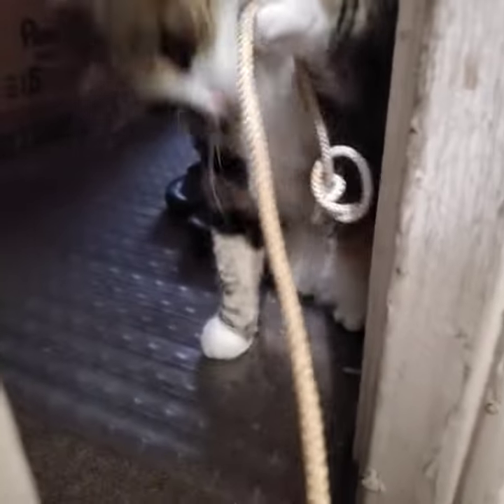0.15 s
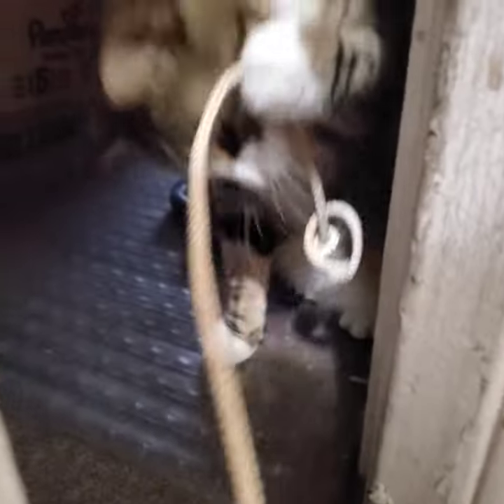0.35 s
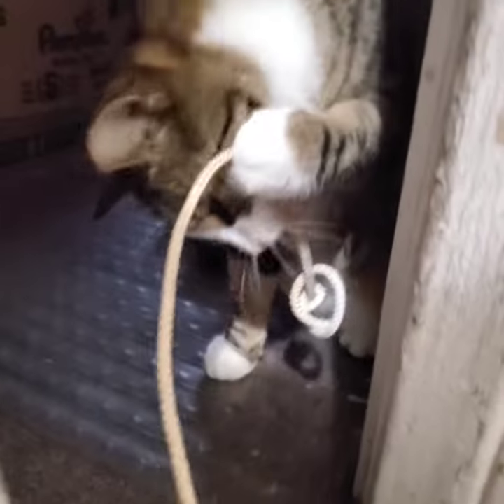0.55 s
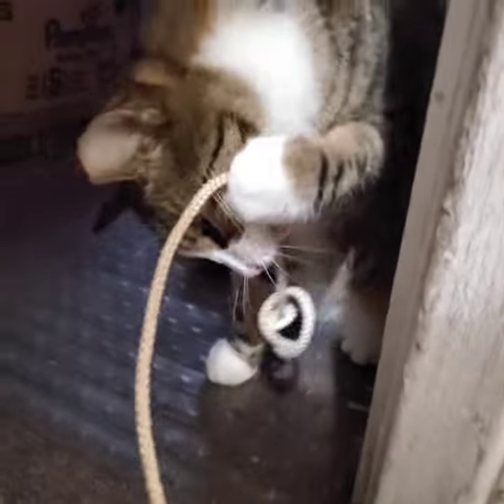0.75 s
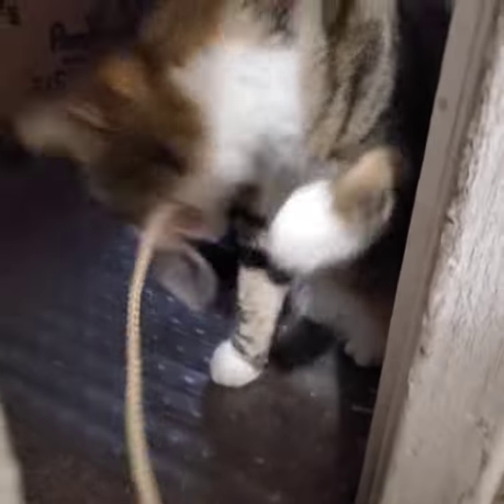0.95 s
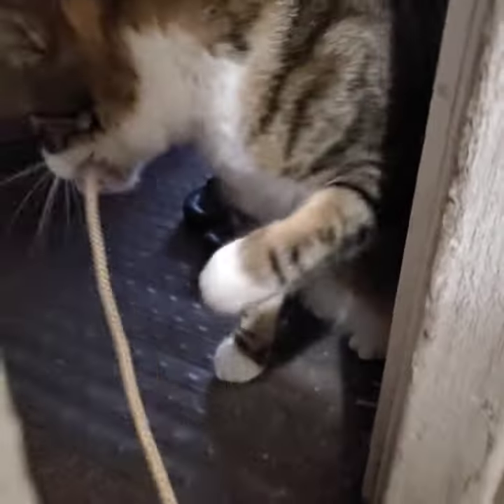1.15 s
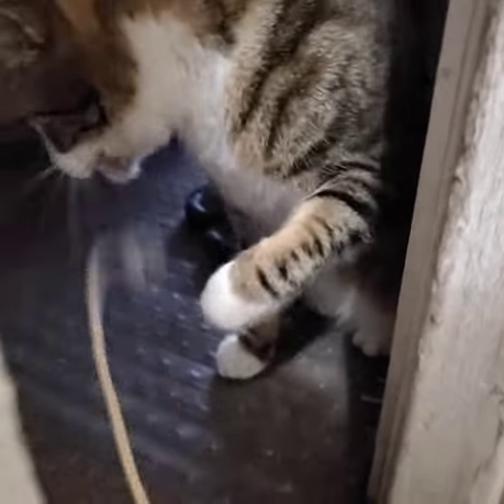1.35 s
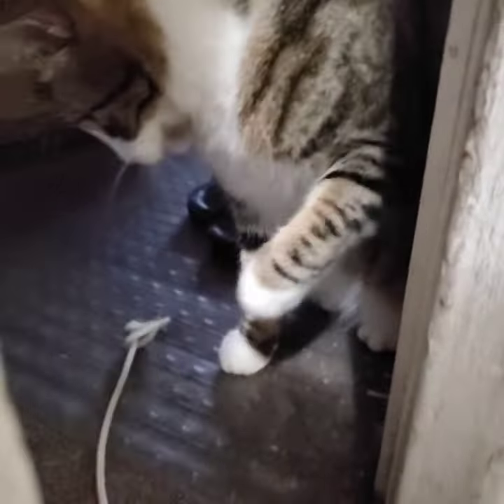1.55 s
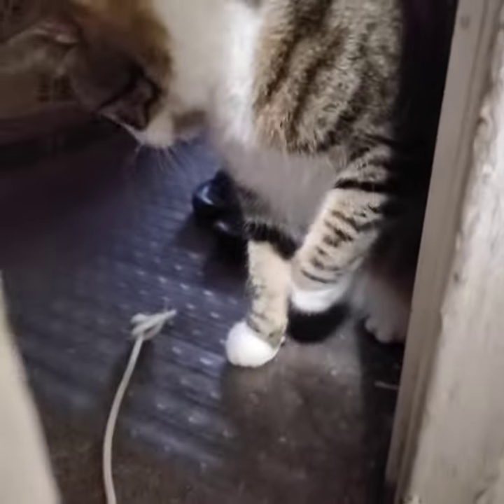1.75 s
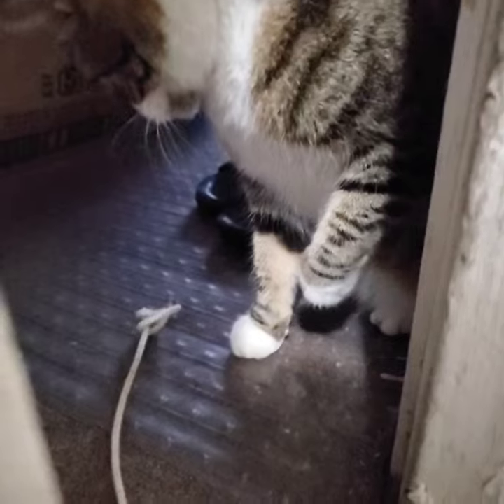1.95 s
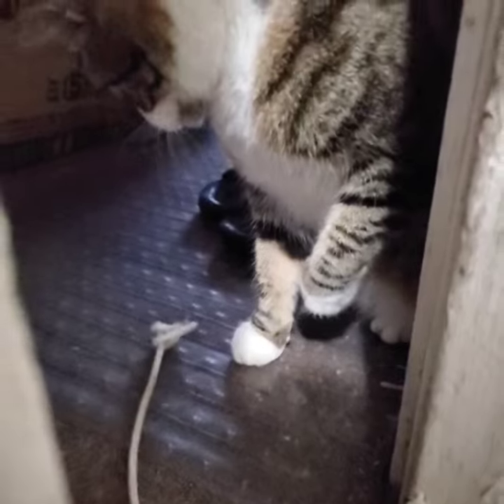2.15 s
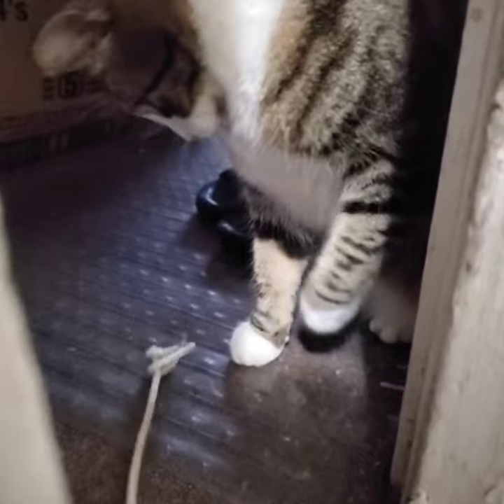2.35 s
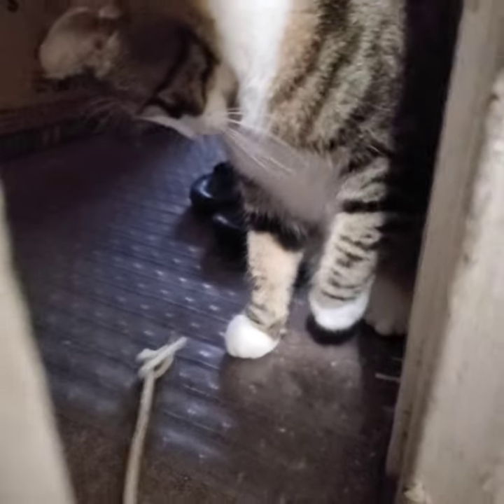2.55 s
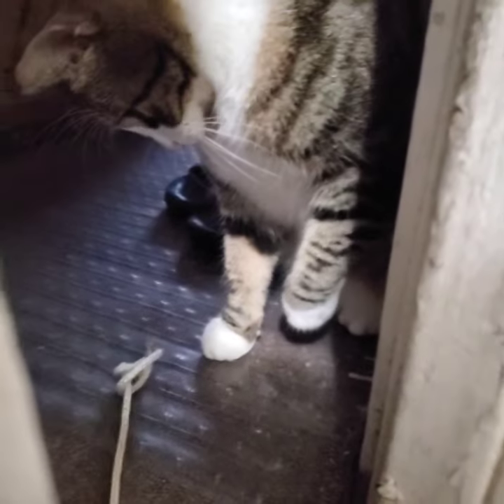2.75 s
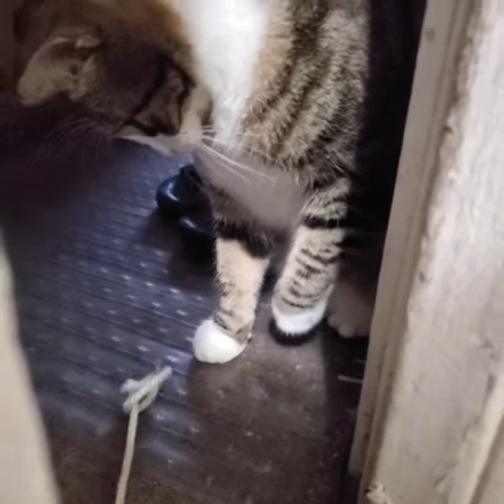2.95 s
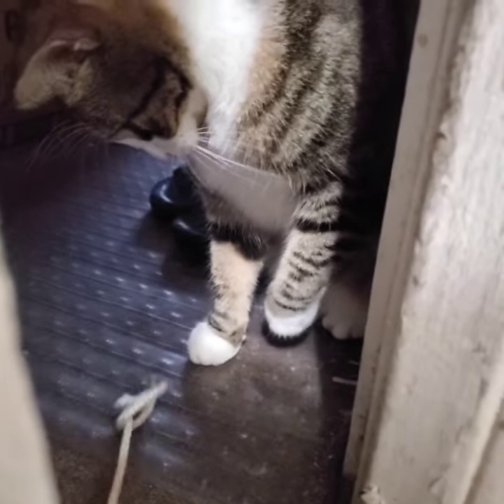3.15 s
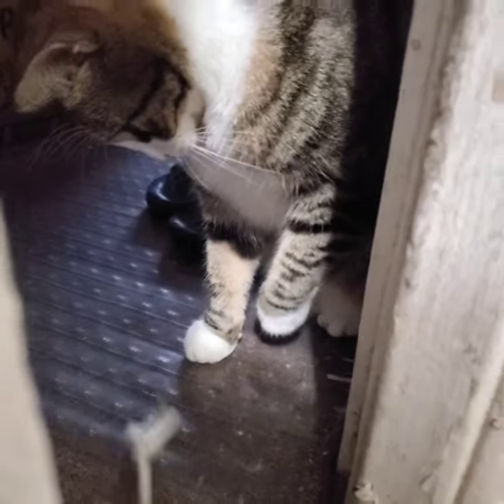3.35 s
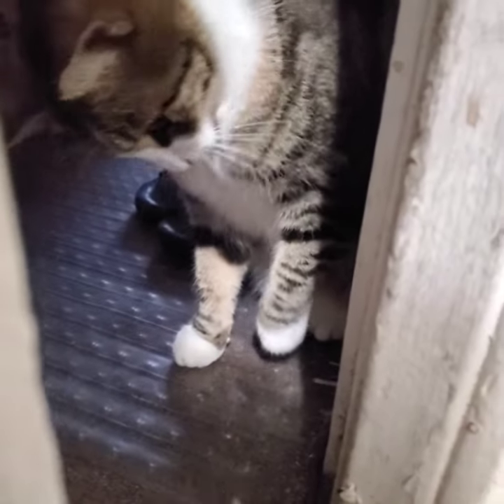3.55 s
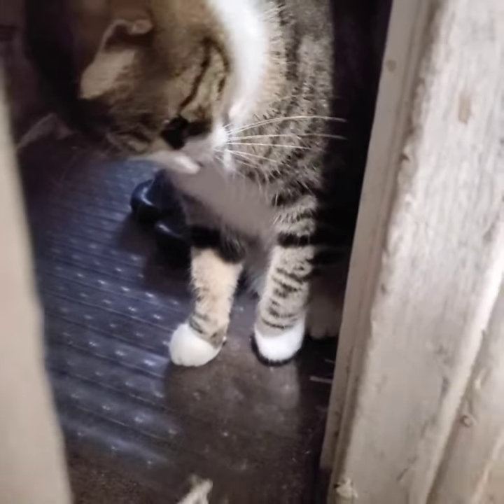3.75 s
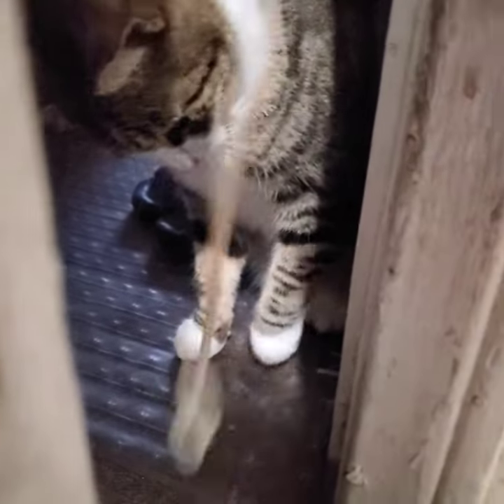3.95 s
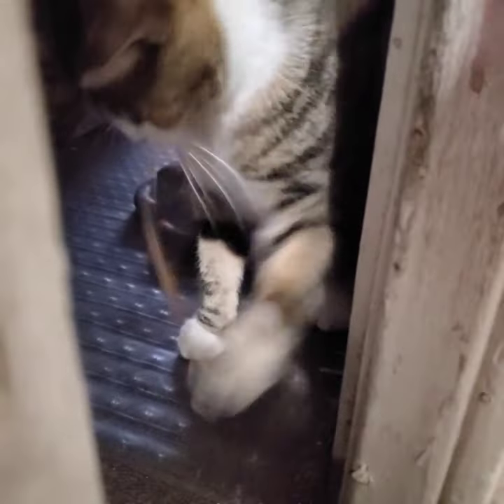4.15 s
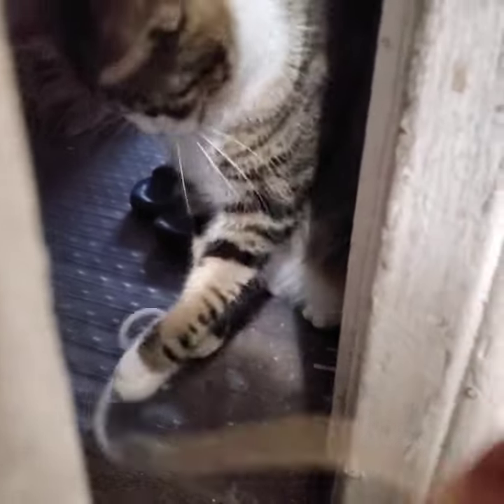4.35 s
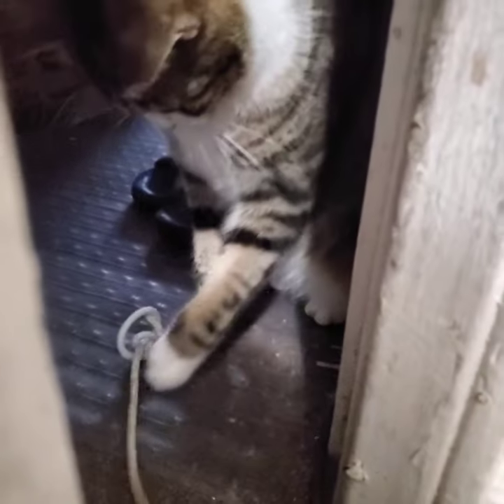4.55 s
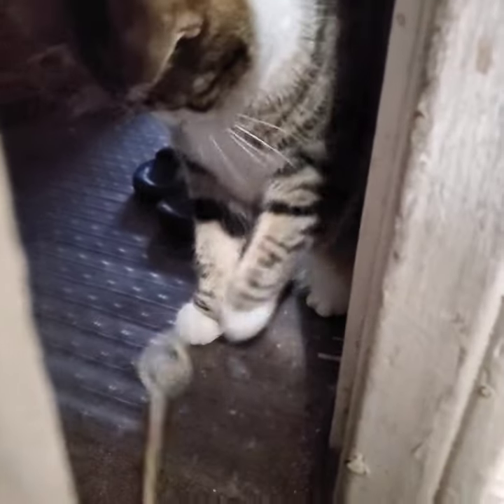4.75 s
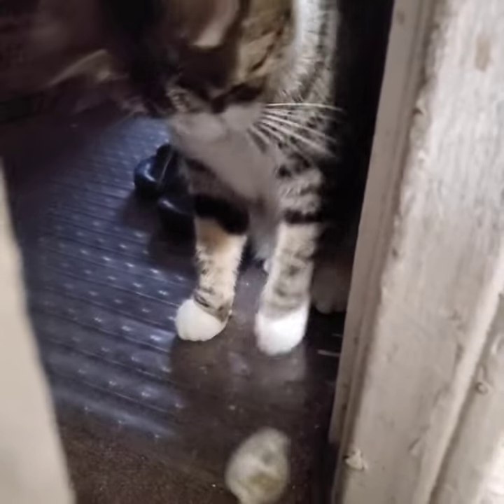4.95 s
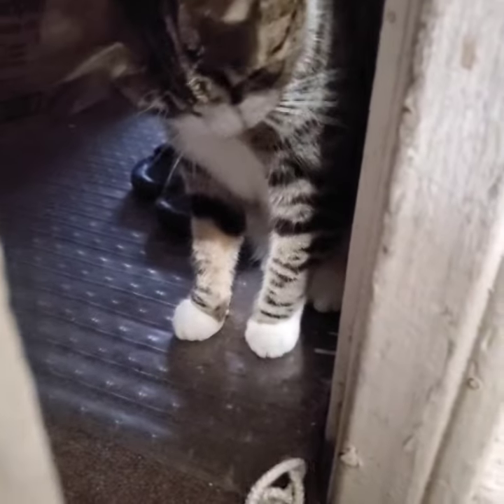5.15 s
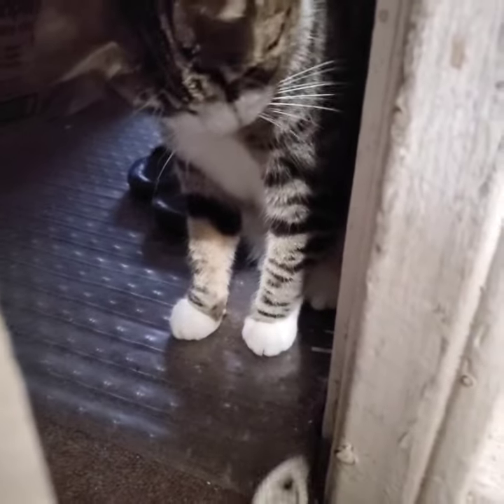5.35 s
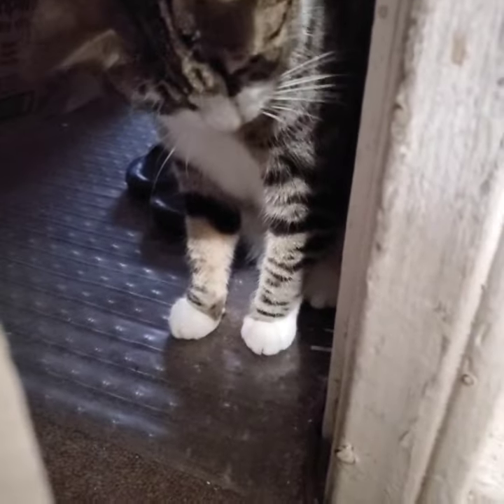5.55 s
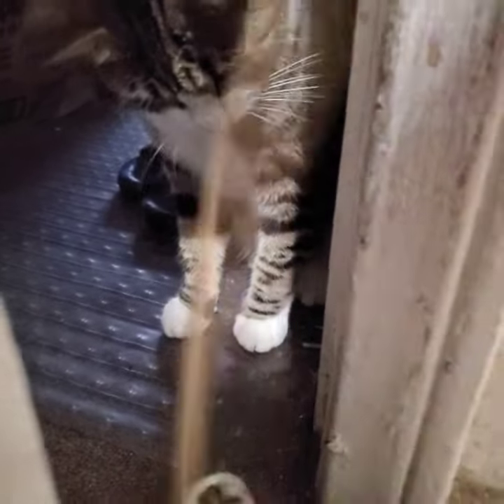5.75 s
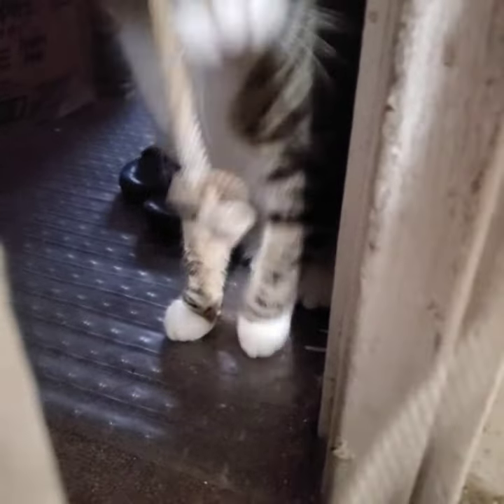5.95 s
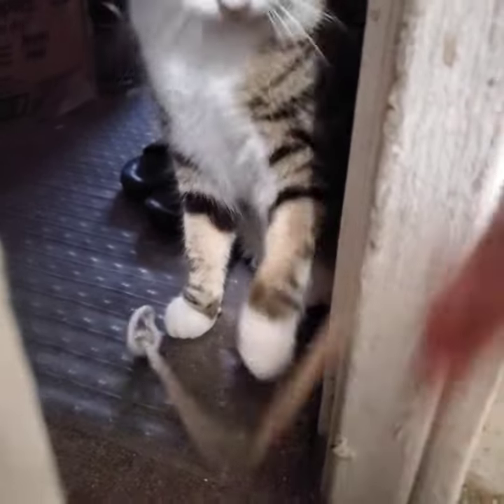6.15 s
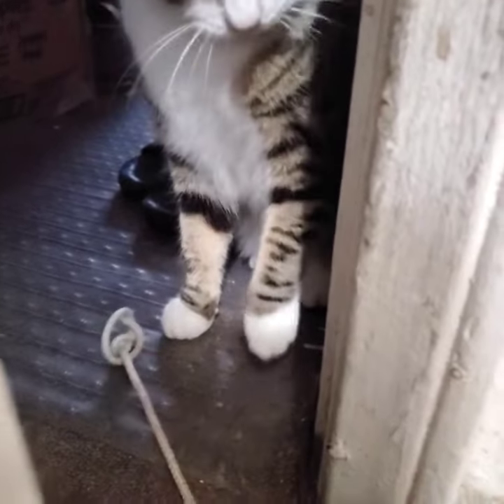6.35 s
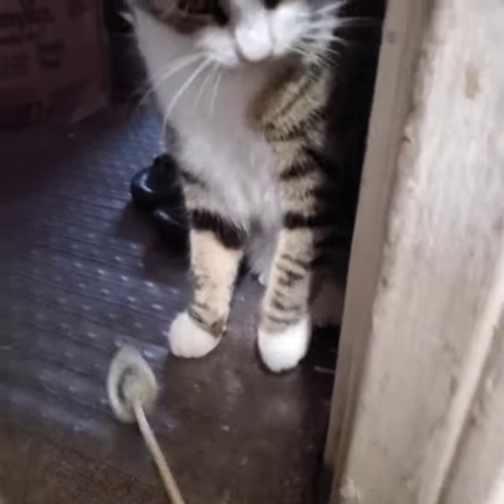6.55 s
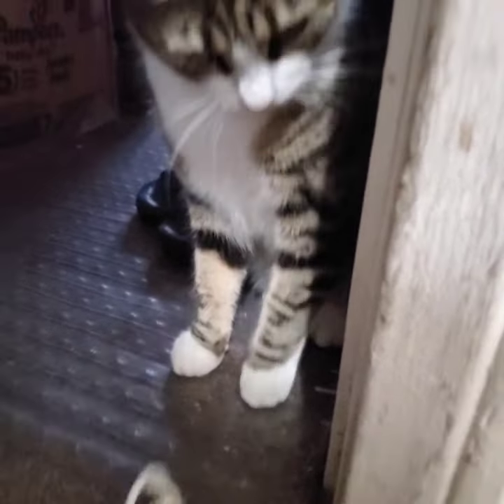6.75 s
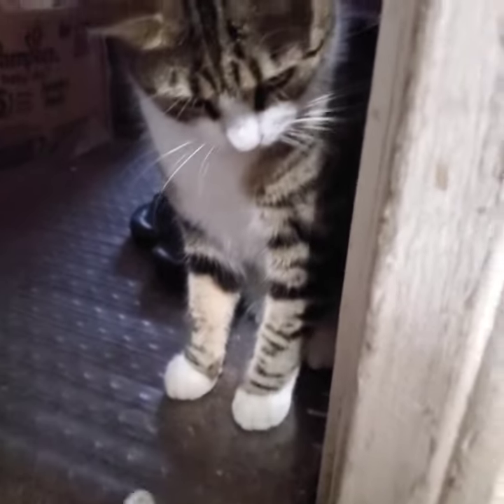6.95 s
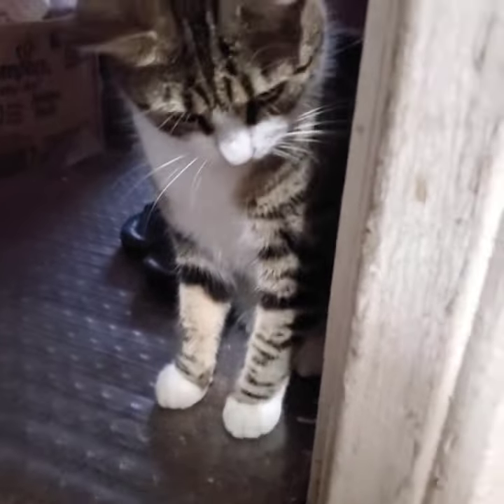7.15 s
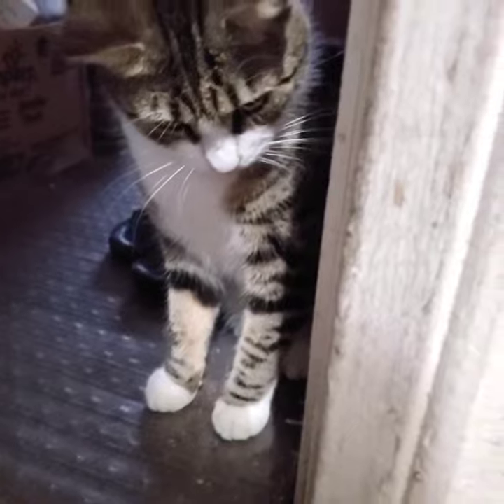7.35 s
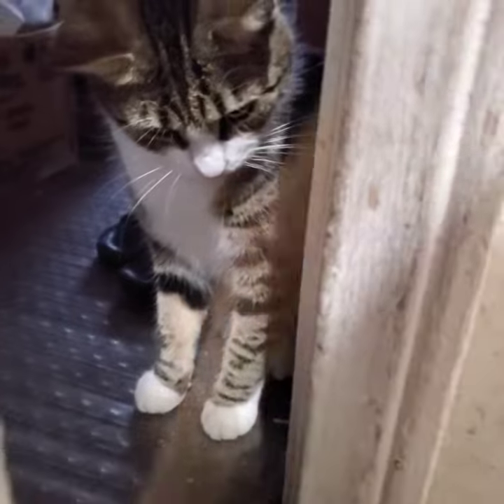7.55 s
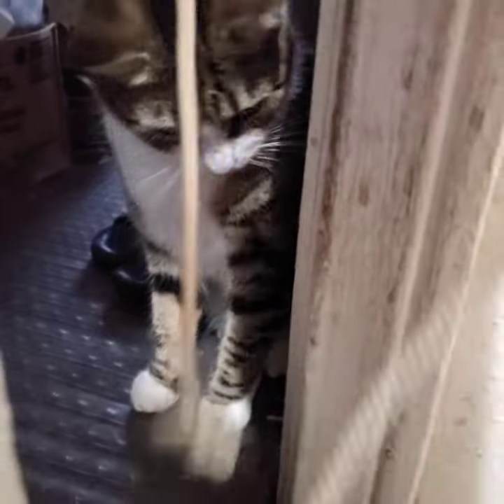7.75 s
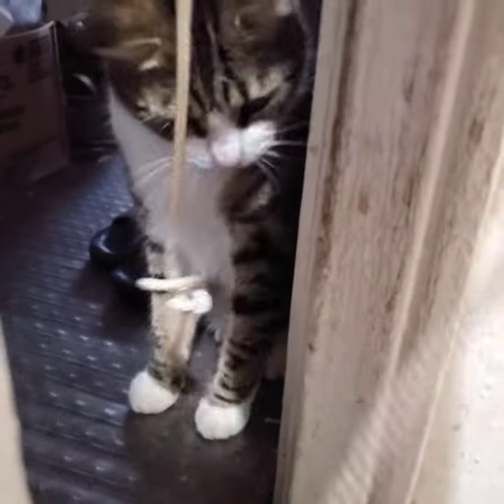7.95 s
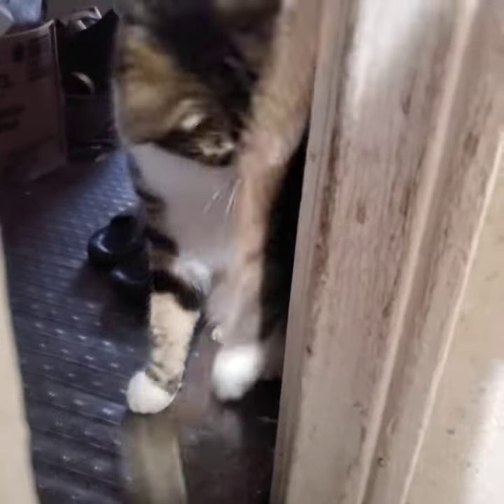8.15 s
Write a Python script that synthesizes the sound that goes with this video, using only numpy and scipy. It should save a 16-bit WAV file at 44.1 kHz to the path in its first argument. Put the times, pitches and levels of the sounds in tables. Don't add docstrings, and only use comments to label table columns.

```python
import sys
import numpy as np
from scipy import signal
from scipy.io import wavfile
from scipy.ndimage import uniform_filter1d

SR = 44100
rng = np.random.default_rng(int(sys.argv[2]) if len(sys.argv) > 2 else 0)


def store_pcm(level_fs):
    pcm = np.round(np.clip(level_fs, -1, 1) * 32767).astype(np.int16)
    wavfile.write(sys.argv[1], SR, np.atleast_2d(pcm).T)


def makeup_ratio(level_db):
    decades = np.asarray(level_db, float) / 20
    return 10 ** decades


N = 365588
TIME = np.arange(N) / SR
LEFT_LAG_S = 0.00051
CUTOFF_HZ = 15900


def rms_one(x):
    return x / np.sqrt(np.mean(x ** 2) + 1e-20)


def at_hz(points, hz):
    curve_hz, value = np.array(points)[:, :2].T
    return np.interp(np.log(hz), np.log(curve_hz), value)


def left_over_right(db):
    return makeup_ratio(db * np.array([[.5], [-.5]]))


def filtered(x, order, edge_hz, kind):
    return signal.sosfilt(signal.butter(order, edge_hz, kind, fs=SR, output="sos"), x)


def drift(rate_hz):
    pole = np.exp(-40 * np.pi * rate_hz / SR)
    noise = rng.standard_normal(N // 20 + 2002)
    slow = signal.lfilter([1], [1, -2 * pole, pole * pole], noise)[2000:]
    return np.interp(np.arange(N) / 20, np.arange(len(slow)), rms_one(slow))


def bands(low_hz, high_hz, count, spectrum, alike_at, lag_s):
    white = rng.standard_normal((2, 3, N))
    lag = round(lag_s * SR)
    edges = np.geomspace(low_hz, high_hz, count + 1)
    for k, (low, high) in enumerate(zip(edges, edges[1:])):
        common, *own = filtered(white[k % 2], 2, [low, high], "band")
        hz = np.sqrt(low * high)
        alike = np.clip(at_hz(alike_at, hz), 0, 1)
        shared = np.array([np.roll(common, lag), common])
        pair = np.sqrt(alike) * shared + np.sqrt(1 - alike) * np.array(own)
        yield hz, makeup_ratio(at_hz(spectrum, hz)) * pair


def ring(hz, t60, length_s):
    t = np.arange(int(length_s * SR)) / SR
    return np.sin(2 * np.pi * hz * t) * makeup_ratio(-60 * t / max(t60, 1e-3))


def add(out, at_s, sound):
    i = round(at_s * SR)
    out[..., i:i + sound.shape[-1]] += sound[..., :N - i]


# (time [s], level [dB])
RUMBLE = [(0.0, -53.5), (0.46, -49.5), (0.69, -52.5), (4.66, -49), (5.06, -47.5), (7.16, -50),
          (8.29, -49.5)]
# (frequency [Hz], density [dB per Hz])
RUMBLE_COLOUR = [(15, -44), (25, -11.5), (46, -12.5), (68, -3), (145, -18), (220, -29), (314, -31.5),
                 (350, -9.5), (409, -34.5), (620, -38.5), (1000, -61), (1300, -91), (2200, -120)]
# (frequency [Hz], share common to both sides [0-1])
RUMBLE_ALIKE = [(30, 1), (100, 0.97), (300, 0.47), (900, 0.11)]
# (frequency [Hz], density [dB per Hz])
HISS = [(530, -32), (900, -2), (1490, -6), (1960, -2), (2460, -8), (5500, -14), (7340, -12), (14900, -10),
        (15800, -13)]
HISS_DB = -80
RUMBLE_LIFT_DB = 4


def background(low_rub):
    low = 0
    for _, pair in bands(33.9, 1000, count=10, spectrum=RUMBLE_COLOUR, alike_at=RUMBLE_ALIKE, lag_s=0):
        low = low + pair * makeup_ratio(1.4 * drift(3.3))
    hiss_alike = [(900, .2), (9000, .05)]
    hiss = sum(pair for _, pair in bands(900, 15900, count=8, spectrum=HISS, alike_at=hiss_alike, lag_s=0))
    house = makeup_ratio(np.interp(TIME, *np.transpose(RUMBLE)))
    level = np.hypot(house, makeup_ratio(RUMBLE_LIFT_DB) * low_rub)
    return level * rms_one(low) * left_over_right(-1.6) + makeup_ratio(HISS_DB) * rms_one(hiss)


# (time of top [s], level [dB], rise [s], fall [s], resonance [Hz])
SHUFFLES = [(.55, -71.5, 0.12, 0.093, 930), (1.07, -81, 0.036, .03, 970), (1.325, -72, 0.079, .03, 960),
            (1.42, -75.5, 0.093, 0.062, 1320), (3.24, -65, 0.21, 0.14, 1000),
            (4.12, -68.5, 0.059, 0.046, 1080), (4.41, -56, .04, 0.049, 1400),
            (4.45, -59.5, 0.062, 0.051, 1380), (4.76, -65, 0.076, 0.18, 960),
            (6.62, -66, 0.035, 0.035, 1200), (7.615, -67.5, 0.023, 0.087, 997), (8.29, -65, 0.11, .05, 983)]
SHUFFLE_DROP_DB = 20.5
SHUFFLE_SOFT_DB = -2.5


def shuffles():
    struck = rng.random((2, N)) < 900 / SR
    clicks = struck * rng.standard_normal((2, N)) * makeup_ratio(4.0 * drift(50))
    soft = rms_one(filtered(clicks + clicks[::-1] + 1e-18, 2, [130, 260], "band"))
    blended = clicks + .6 * clicks[::-1] + 1e-18
    out = 0
    for s, db, rise_s, fall_s, hz in SHUFFLES:
        away = np.maximum((s - TIME) / rise_s, (TIME - s) / fall_s)
        level = makeup_ratio(db - SHUFFLE_DROP_DB * away ** 2)
        rings = filtered(blended, 3, [hz / 1.35, hz * 1.35], "band")
        out = out + level * (1.2 * rms_one(rings) + makeup_ratio(SHUFFLE_SOFT_DB) * soft)
    return out


# (time [s], pitch [Hz], level [dB])
SQUEAK = [
    (.925, 6800, -104),
    (.96, 7450, -94),
    (1.0, 7800, -97),
    (1.06, 7850, -96),
    (1.11, 7350, -93),
    (1.145, 6700, -104),
]


def squeak():
    s, hz, db = np.transpose(SQUEAK)
    phase = 2 * np.pi * np.cumsum(np.interp(TIME, s, hz)) / SR
    level = makeup_ratio(np.interp(TIME, s, db, left=-140, right=-140) + 3.2 * drift(34))
    octave = makeup_ratio(-2) * np.sin(2 * phase)
    second_reed = makeup_ratio(-2) * np.sin(phase * 2 / 3)
    return level * (np.sin(phase) + octave + second_reed)


# (start [s], length [s], share of it to top speed [0-1], level [dB], brightness [dB])
CREEPS = [
    (1.13, .08, .4, -79, 2),
    (1.96, .18, .8, -74, 5),
    (3.79, .12, .15, -72, -3),
    (4.64, .24, .8, -72, .1),
    (6.28, .36, .3, -73, 1.5),
    (7.39, .13, .3, -71, .1),
    (7.585, .18, .8, -83, 3),
    (7.79, .14, .2, -74, 0),
    (8.15, .2, .7, -82, 2),
]
# (start [s], length [s], share of it to top speed [0-1], level [dB], brightness [dB])
PULLS = [(2.111, 0.15, 0.37, -58.5, -3.5), (2.228, 0.28, 0.6, -50.5, -2), (2.497, .24, 0.26, -52, -5),
         (2.714, 0.23, 0.36, -62, 1), (2.924, 0.18, 0.36, -60, -3.5), (3.083, 0.079, 0.49, -51, -3.5),
         (3.16, 0.15, 0.86, -58, 0), (3.363, 0.12, 1, -54.5, 4.5), (3.712, 0.098, 0.78, -56, -8.5),
         (4.161, 0.18, 0.81, -55, -1.5), (4.826, 0.38, 0.38, -41.5, -2.2), (5.222, 0.12, 0.69, -55, 5),
         (5.311, 0.33, 0.67, -52, 5), (5.647, 0.15, 0.5, -53, -4), (6.035, 0.17, 0.91, -47.5, -3.5),
         (6.179, .12, 0.27, -43, -10), (6.413, 0.056, 0.22, -70, 9.5), (6.626, 0.34, 0.34, -42.5, -5),
         (6.95, 0.16, 0.92, -49.5, -4), (7.112, 0.072, 0.94, -60.5, -0.5), (7.179, 0.23, 0.4, -49.5, 1.5)]
# (start [s], hold [s], decay t60 [s], level [dB], brightness [dB])
JERKS = [
    (1.494, 0.0036, 0.26, -55.5, -6),
    (3.304, 0.009, 0.16, -47.5, 2),
    (3.443, 0.22, 0.056, -45.5, 5),
    (3.941, 0.033, 0.052, -45, -9),
    (4.036, 0.023, .1, -58, -4.5),
    (4.119, 0.014, 0.05, -62.5, -4),
    (4.286, .045, .34, -42.5, -6),
    (5.854, 0.044, 0.062, -46.5, -4.5),
    (5.969, 0.014, 0.22, -55.5, -9),
    (7.737, 0.0096, 0.44, -60, -14),
]
# (time [s], resonance [Hz], extra weight on the mat [dB])
CONTACT = [(2.35, 2786, 2), (2.62, 4310, 3), (3.0, 3003, 0.7), (3.45, 3260, 1.5), (3.64, 5650, -2.5),
           (3.78, 2815, 0), (3.97, 3130, -3.8), (4.32, 3970, 1.3), (5.0, 4750, -0.2), (5.12, 3650, 1.4),
           (5.5, 2960, -1.5), (5.72, 3695, -2.5), (5.95, 2900, -3), (6.23, 4090, -1.2), (6.5, 3610, 4.5),
           (6.75, 4050, .6), (7.0, 4390, -1), (7.33, 4050, -1.5)]
SPEED_POWER = 0.86
JERK_ATTACK_S, JERK_BRIGHTENS_DB_PER_S = 0.011, 31.5
PULL_LOW_DB, JERK_LOW_DB = -5, -9
LOW_BUILDS_DB, LOW_BUILDS_S = 9, 0.22
EDGE_DB, EDGE_SHARE, LOW_SHARE = 0, 0.28, 0.45
SETTLE_DB, SETTLE_T60_S = -16, 0.52


def drag_levels():
    power = np.zeros((4, N))
    for s, length_s, top, db, bright_db in PULLS + CREEPS:
        on = slice(round(s * SR), round((s + length_s) * SR))
        top_s = np.clip(top, .05, .95) * length_s
        speed = np.sin(np.interp(TIME[on] - s, [0, top_s, length_s], [0, np.pi / 2, np.pi]))
        low_db = PULL_LOW_DB + LOW_SHARE * bright_db
        edge_db = EDGE_DB + EDGE_SHARE * bright_db
        tone_db = np.array([[low_db], [0], [edge_db], [bright_db]])
        power[:, on] += (makeup_ratio(db + tone_db) * np.abs(speed) ** SPEED_POWER) ** 2

    t = np.arange(SR // 2) / SR
    for s, hold_s, t60, db, bright_db in JERKS:
        fading_s = np.maximum(t - JERK_ATTACK_S - hold_s, 0)
        shape = np.minimum(t / JERK_ATTACK_S, 1) * makeup_ratio(db - 60 * fading_s / t60)
        bright = bright_db + JERK_BRIGHTENS_DB_PER_S * (np.minimum(t, hold_s) - hold_s / 2)
        low = JERK_LOW_DB + LOW_BUILDS_DB * (1 - np.exp(-t / LOW_BUILDS_S)) + LOW_SHARE * bright_db
        edge = EDGE_DB + EDGE_SHARE * bright
        add(power, s, (shape * makeup_ratio(np.array([low, 0 * t, edge, bright]))) ** 2)

    keep = makeup_ratio(-120 / (SETTLE_T60_S * SR))
    power += makeup_ratio(2 * SETTLE_DB) * signal.lfilter([1 - keep], [1, -keep], power)
    s, _, weight_db = np.transpose(CONTACT)
    power[0] *= makeup_ratio(2 * np.interp(TIME, s, weight_db))
    return np.sqrt(power)


ZONE_EDGES_HZ = [1700, 4000, 8000]
# (frequency [Hz], density [dB per Hz])
SCRAPE = [(200, -2.5), (350, -6.5), (560, -3.5), (760, -5), (1250, -2.5), (1800, -8.5), (2700, -2),
          (3900, -7.5), (5500, -6.5), (7200, -4.5), (8500, -13.5), (9800, -15.5), (11500, 0.5),
          (16000, -9.5)]
# (frequency [Hz], left minus right [dB])
SCRAPE_LEAN = [(60, -2.5), (180, -16), (550, -8), (1650, -8.5), (4970, -13), (15000, -15.5)]
# (frequency [Hz], share common to both sides [0-1])
SCRAPE_ALIKE = [(200, 1), (1000, 0.48), (3000, 0.2), (8000, 0.32), (15000, 0.84)]
# (time [s], left minus right at 4 kHz [dB])
PLACE = [
    (2.05, -0.5),
    (2.16, -9),
    (3.78, -5),
    (4.23, -14.0),
    (4.27, 7),
    (4.31, -4.5),
    (7.05, -7.5),
    (7.72, -4.5),
    (7.9, 1),
]
CONTACT_DB, CONTACT_OCTAVES = 5, .27


def scrape(levels):
    caught = rng.random(N) < 120 / SR
    catches = caught * makeup_ratio(3.5 * np.minimum(rng.exponential(1, N), 4))
    grains = signal.lfilter([1], [1, -np.exp(-1 / (0.001 * SR))], catches)
    bumps = makeup_ratio(0.27 * drift(28) + 1.6 * drift(120)) * (1 + 0.14 * grains)

    zones = np.zeros((4, 2, N))
    contact_hz = np.interp(TIME, *np.transpose(CONTACT)[:2])
    for hz, pair in bands(200, 15200, count=19, spectrum=SCRAPE, alike_at=SCRAPE_ALIKE, lag_s=LEFT_LAG_S):
        lean = left_over_right(at_hz(SCRAPE_LEAN, hz))
        octaves_off = np.log2(hz / contact_hz)
        resonance = makeup_ratio(CONTACT_DB * np.exp(-(octaves_off / CONTACT_OCTAVES) ** 2))
        zones[np.searchsorted(ZONE_EDGES_HZ, hz)] += pair * lean * resonance * makeup_ratio(2.3 * drift(9))

    shift_db = np.interp(TIME, *np.transpose(PLACE)) - at_hz(SCRAPE_LEAN, 4000)
    zones *= bumps * left_over_right(shift_db)
    gains = uniform_filter1d(levels, size=120, axis=1)
    return sum(gain * zone / np.std(zone.mean(axis=0)) for gain, zone in zip(gains, zones))


# (time [s], peak [dB], slap pitch [Hz], decay t60 [s], floor thud against slap [dB])
LANDINGS = [(1.5027, -11, 760, 0.0013, -10), (1.5134, -36.5, 1367, 0.039, 9),
            (1.5917, -45.5, 700, 0.0038, 10), (4.279, -14.5, 1264, 0.0042, -39),
            (4.2852, -25.5, 1270, 0.0044, -28), (4.2878, -23.5, 1595, .004, -18),
            (4.2905, -35, 1260, .012, -16), (4.849, -36.5, 1320, 0.0065, -2),
            (4.917, -36, 1150, 0.0095, -12), (6.1793, -13, 1315, 0.0047, -18),
            (6.1817, -33, 1580, 0.019, -18.5), (6.3461, -36.5, 1900, 0.0017, -6)]
# (time [s], peak [dB], slap pitch [Hz], decay t60 [s], thud against slap [dB])
BUMPS = [
    (2.594, -43, 900, 0.0023, -7),
    (2.612, -39.5, 900, 0.0027, -5),
    (2.837, -52.5, 700, 0.00089, 15),
    (3.4568, -30, 450, 0.026, -4),
    (5.051, -34, 1470, 0.0072, -27),
]
LANDING_PAN_DB, BUMP_PAN_DB = 4, -16


def slaps():
    length_s = .06
    t = np.arange(int(length_s * SR)) / SR
    out = np.zeros((2, N))
    floor = ring(370, 0.0087, length_s) + makeup_ratio(-10.0) * ring(186, 0.071, length_s)
    crack = makeup_ratio(-12.5) * ring(3900, .003, length_s)
    rows = [(*row, LANDING_PAN_DB) for row in LANDINGS] + [(*row, BUMP_PAN_DB) for row in BUMPS]
    for s, peak_db, hz, t60, thud_db, pan_db in rows:
        turns = hz * (t + 0.0001 * (1 - np.exp(-t / 0.0001)))
        decay = makeup_ratio(-60 * t / max(t60, 1e-3))
        slap = -1.3 * np.sin(2 * np.pi * turns) * decay * (1 - np.exp(-t / .00006))
        slap *= 1 + 1.2 * np.exp(-t / .0003)
        hit = slap + makeup_ratio(thud_db) * floor - crack
        add(out, s, makeup_ratio(peak_db) * left_over_right(pan_db) * hit)
    return out


HALL_T60_S, HALL_DB = 0.15, -15.5


def hall(x):
    t = np.arange(int(.3 * SR)) / SR
    wash = rng.standard_normal((2, len(t))) * makeup_ratio(-60 * t / HALL_T60_S) * np.minimum(t / 0.0016, 1)
    wash = signal.lfilter([.4], [1, -.6], wash)
    wash /= np.sqrt(np.sum(wash ** 2, axis=1, keepdims=True))
    return signal.fftconvolve(x.mean(axis=0, keepdims=True), wash)[:, :N]


# (time [s], peak [dB])
SNAPS = [(1.559, -48), (2.901, -39), (3.3124, -21.5), (3.388, -30), (3.5165, -19), (3.612, -15.5),
         (3.6599, -14.5), (3.665, -15.5), (3.8825, -43.5), (4.8758, -38), (5.238, -30.5), (5.309, -27.5),
         (5.4824, -29), (5.501, -32), (5.6092, -36), (5.9132, -21), (6.425, -44.5), (7.084, -32.5),
         (7.198, -32), (7.225, -26.5), (7.3222, -25), (7.8214, -43.5)]
# (time [s], peak [dB])
CATCHES = [(2.081, -46), (2.422, -29), (2.514, -45), (2.614, -47), (3.089, -40), (3.457, -18.5),
           (3.7835, -41), (3.948, -33), (4.12, -41), (5.1136, -19.5), (5.1453, -21), (5.977, -40),
           (6.0537, -31.5), (6.638, -39), (7.756, -42)]
SNAP_BODY_DB, CATCH_BODY_DB = -29.5, -9.5


def snags():
    out = np.zeros((2, N))
    t = np.arange(400) / SR
    rows = sorted([(*row, SNAP_BODY_DB) for row in SNAPS] + [(*row, CATCH_BODY_DB) for row in CATCHES])
    draws = rng.standard_normal((len(rows), 2, len(t)))
    bright = filtered(draws[:, 0], 2, 4000, "high")
    dull = filtered(draws[:, 1], 2, [1000, 4000], "band")
    shape = makeup_ratio(-60 * t / .016) * np.minimum(t / .0008, 1)
    smear = np.cos(2 * np.pi * 900 * t)
    for (s, peak_db, body_db), high, low in zip(rows, bright, dull):
        burst = makeup_ratio(peak_db - 7) * (high + 2.5 * makeup_ratio(body_db) * low) * shape
        add(out[1], s, makeup_ratio(7.5) * burst)
        add(out[0], s + LEFT_LAG_S, makeup_ratio(2.5) * burst * smear)
    return out


def scene():
    levels = drag_levels()
    steady = background(levels[0]) + scrape(levels)
    steep_low_pass = signal.ellip(10, .5, 50, CUTOFF_HZ, fs=SR, output="sos")
    steady = signal.sosfilt(steep_low_pass, steady)
    knocks = filtered(slaps(), 2, 6500, "low")
    return steady + shuffles() + squeak() + knocks + makeup_ratio(HALL_DB) * hall(knocks) + snags()


def top_cut(x):
    return signal.sosfilt(signal.butter(12, 16980, fs=SR, output="sos"), x)


def record(dry):
    low_pass = signal.cheby2(10, 50, CUTOFF_HZ + 900, fs=SR, output="sos")
    mix = signal.sosfilt(low_pass, dry)
    return top_cut(mix)


dry = scene()
out = record(dry)
store_pcm(out)
```